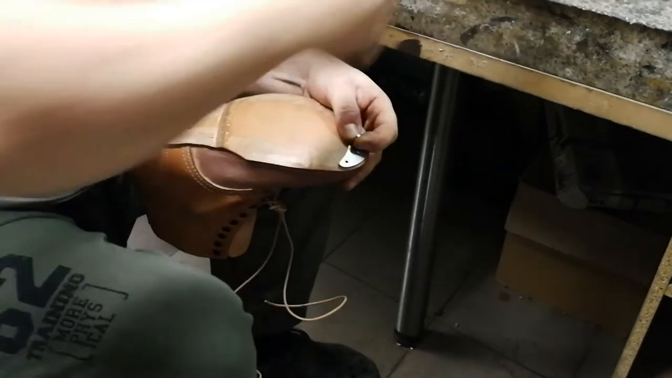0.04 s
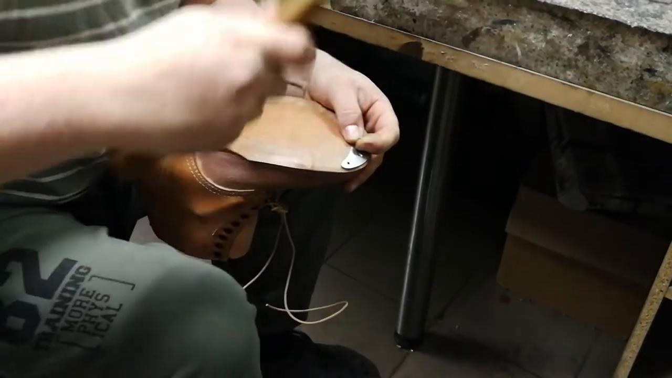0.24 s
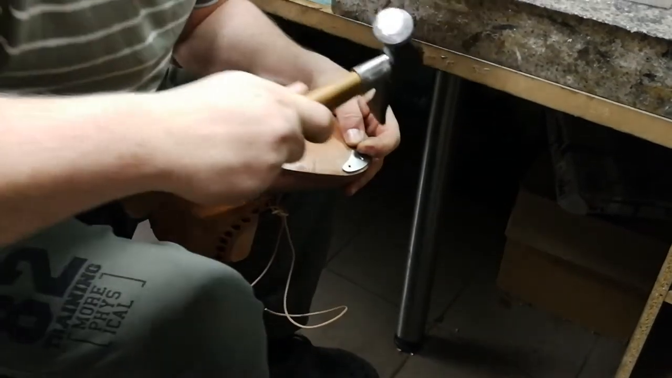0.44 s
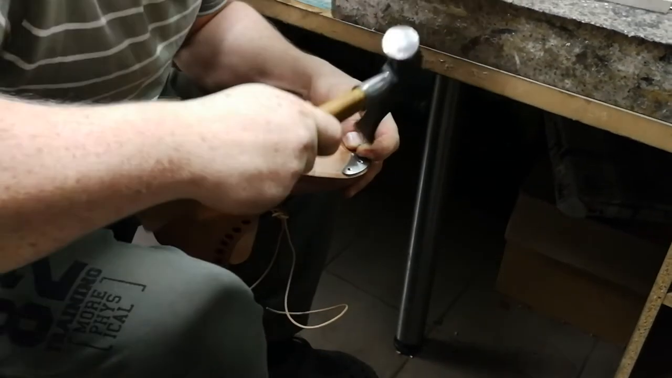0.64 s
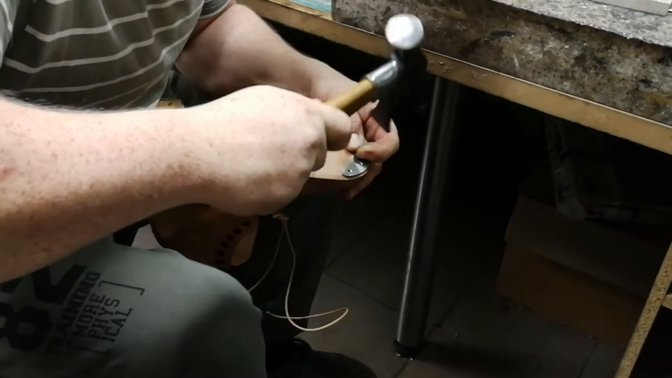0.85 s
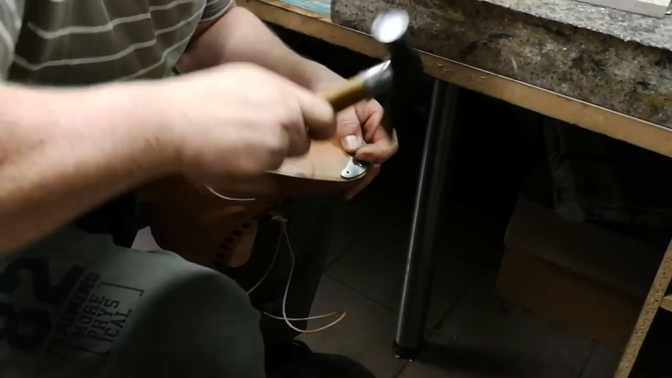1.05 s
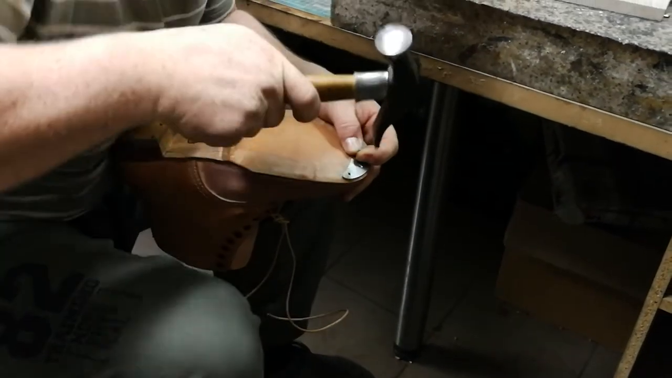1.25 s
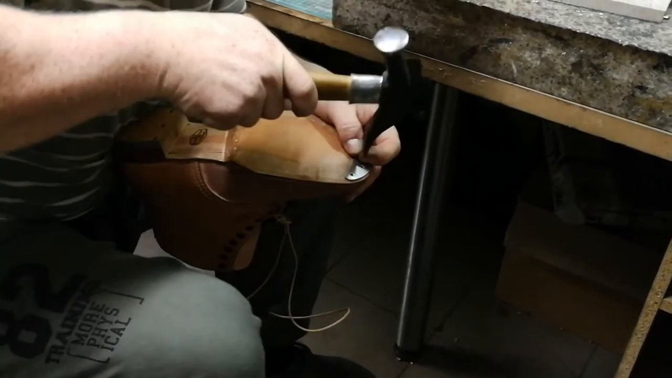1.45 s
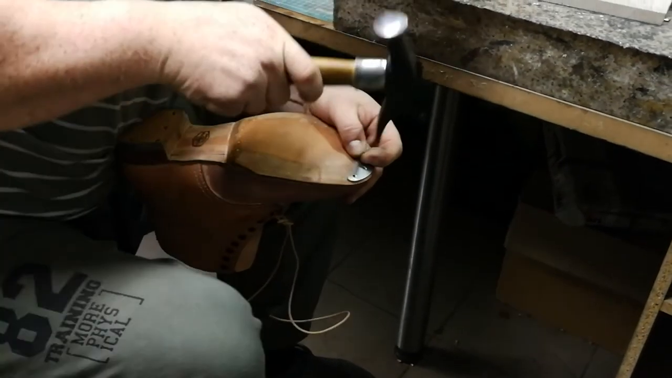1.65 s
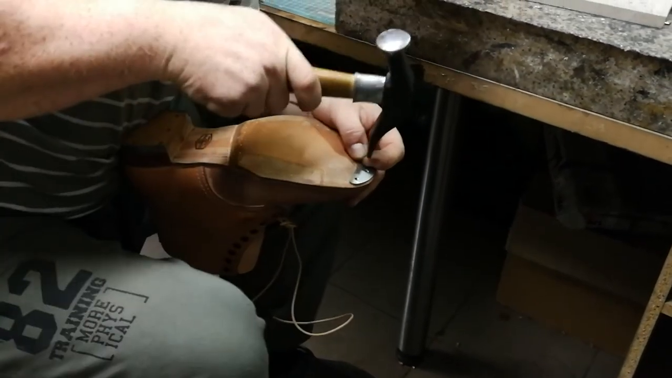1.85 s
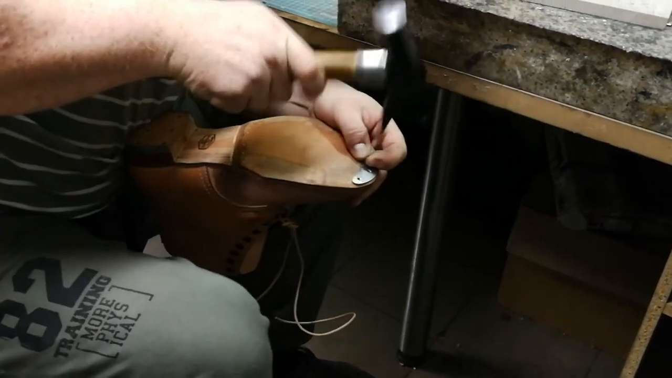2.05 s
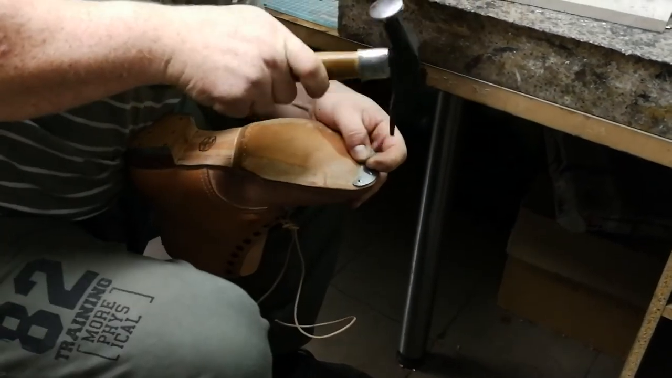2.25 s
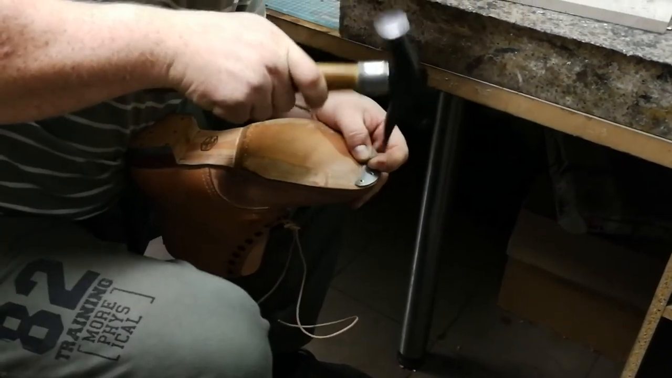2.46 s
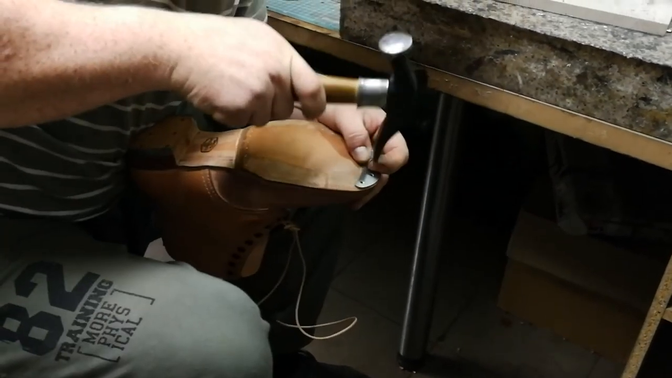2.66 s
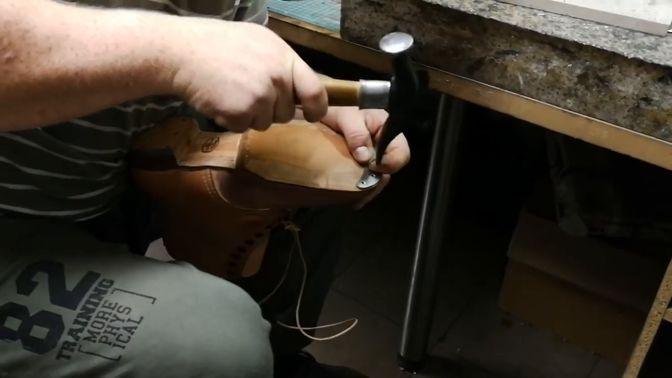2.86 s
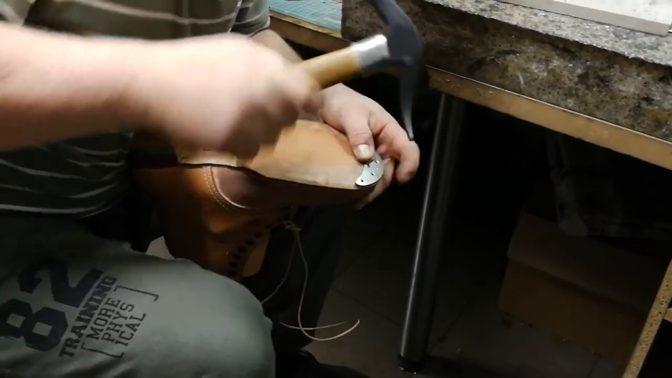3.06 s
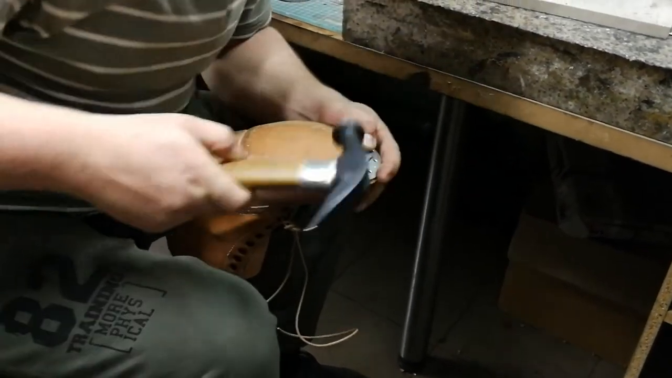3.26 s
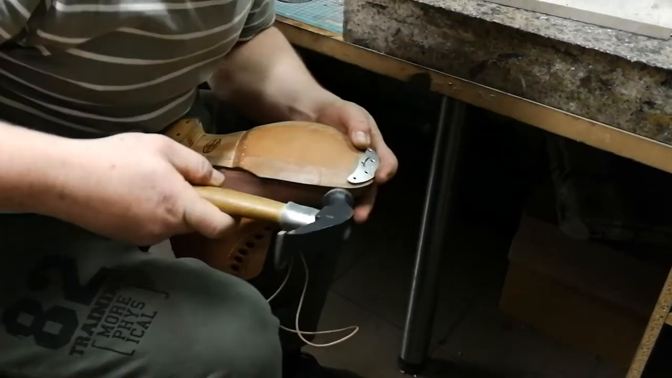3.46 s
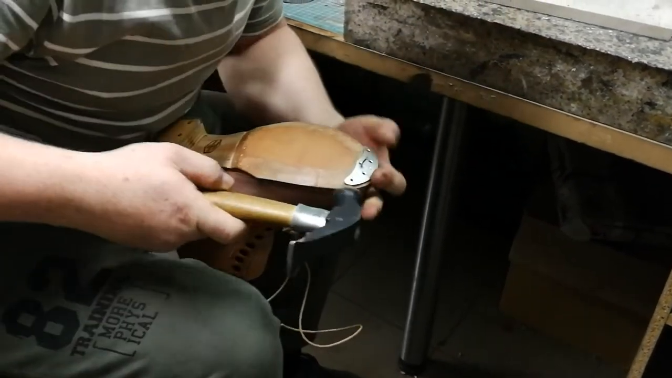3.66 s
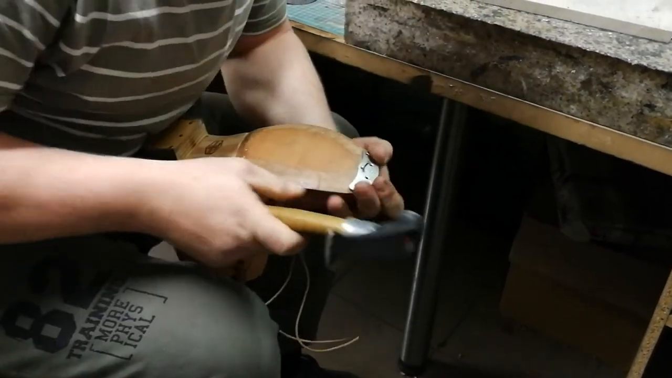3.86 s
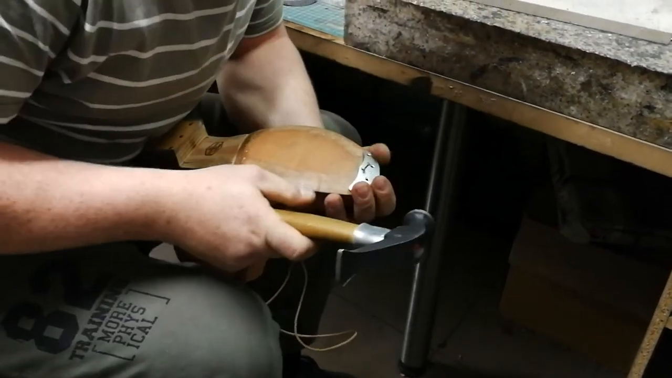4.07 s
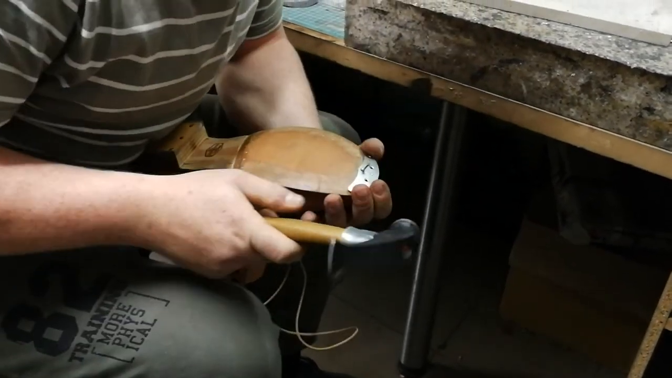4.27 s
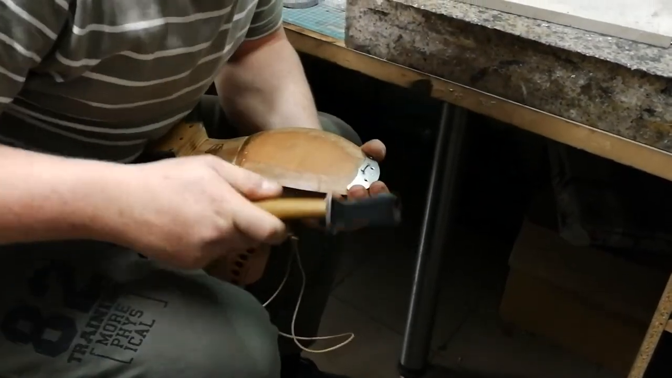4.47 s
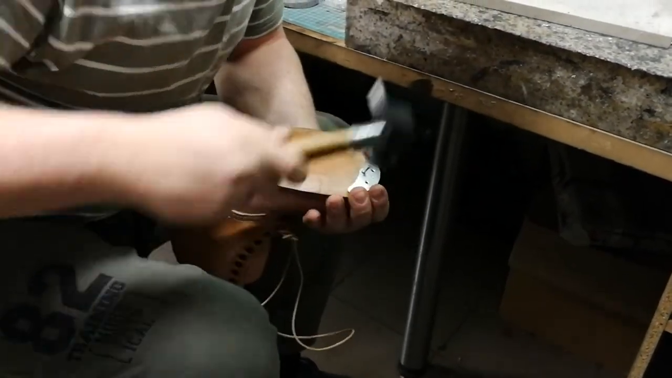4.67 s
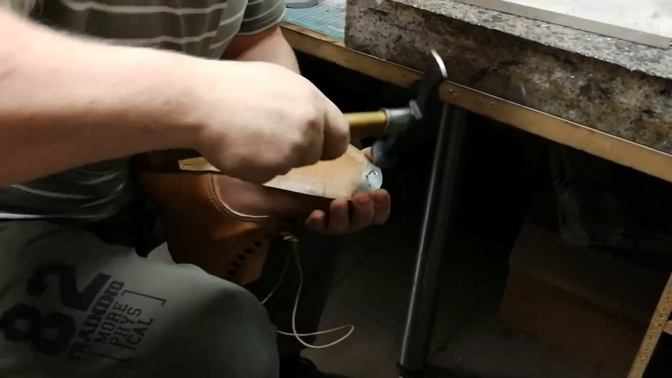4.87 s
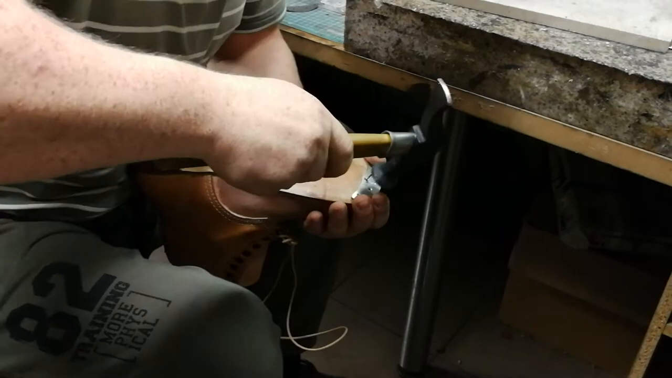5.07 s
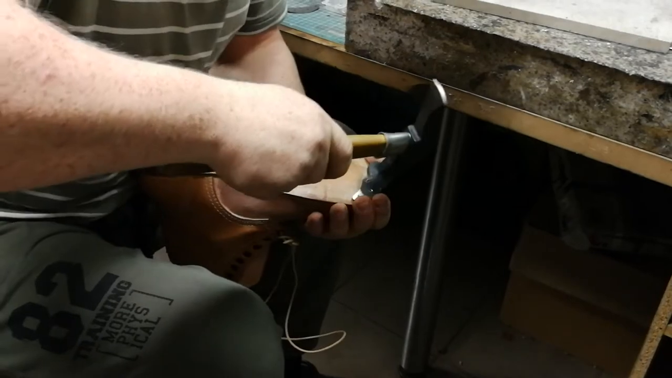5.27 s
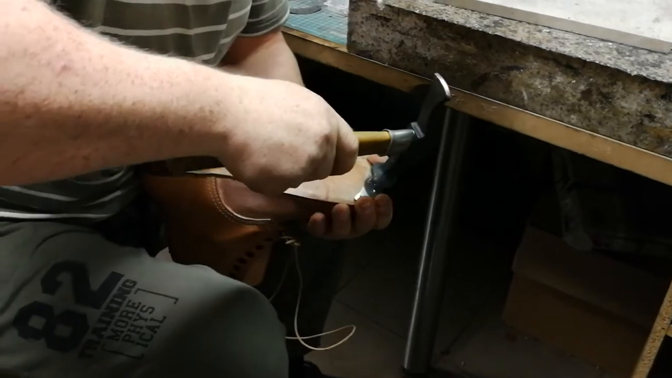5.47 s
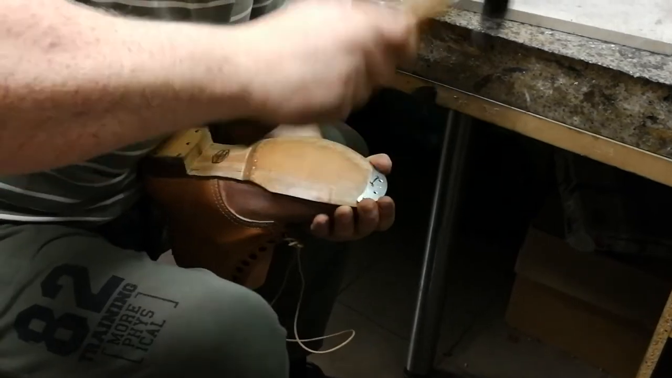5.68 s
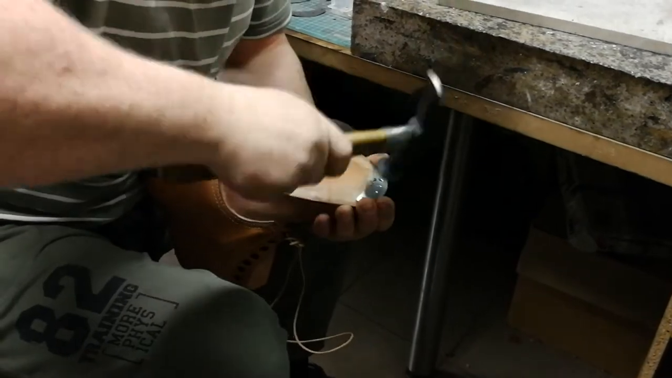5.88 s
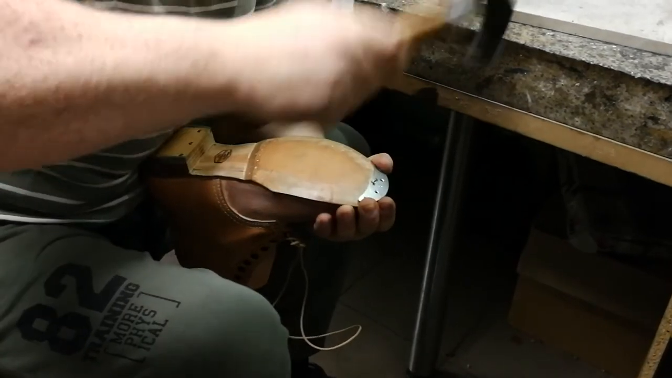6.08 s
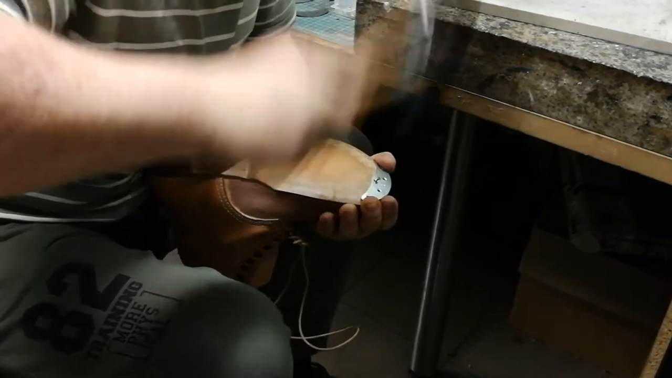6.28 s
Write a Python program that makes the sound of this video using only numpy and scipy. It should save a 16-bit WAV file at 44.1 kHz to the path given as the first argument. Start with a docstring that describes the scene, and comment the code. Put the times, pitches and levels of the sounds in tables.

```python
"""A cobbler nails a steel toe plate to a leather boot held on his knee, in a small, quiet workshop.
First, six taps of growing force set the nail; each impact cracks, excites the damped modes of the
hollow boot and reverberates in the room. In the pause that follows, the hands shift their grip, with
soft knocks and friction on the leather. Then the broad hammer face strikes three times: the first blow
glances off the plate and leaves the steel ringing, and the last two, the hardest, drive the nail home."""
import sys
import numpy as np
from scipy import signal
from scipy.fft import rfft, irfft
from scipy.io import wavfile
from scipy.ndimage import uniform_filter1d

SR = 44100
rng = np.random.default_rng(int(sys.argv[2]) if len(sys.argv) > 2 else 0)


def bounce(signal):
    """Save signal as a 16-bit WAV file at the path given by the first command-line argument."""
    frames = np.transpose(np.atleast_2d(signal))
    limited = np.clip(frames, -1, 1)
    pcm = np.round(limited * 32767).astype(np.int16)
    wavfile.write(sys.argv[1], SR, pcm)


N = 279594
AGE = np.arange(int(.7 * SR)) / SR  # time since the onset of an event [s]

# background noise of the building (frequency [Hz], spectral level [dB])
AIR_SPECTRUM = [(15, -43), (25, 0.5), (44, -2), (97, -5.5), (212, -1), (249, -10), (335, -14.5), (463, -21),
                (545, -18.5), (591, -33.5), (641, -21.5), (1520, -20.5), (6380, -26.5), (9320, -26),
                (16000, -37)]
# reverberation time of the workshop (frequency [Hz], t60 [s])
ROOM_DECAY = [(250, 0.29), (1000, 0.25), (4000, 0.28), (8000, 0.23), (10500, 0.2), (13000, 0.17)]
# first reflections from bench and floor (delay [s], level [dB], left minus right [dB])
EARLY_REFLECTIONS = [(.0053, -14.5, -0.5), (0.0119, -16, 0)]
# standing waves of the workshop (frequency [Hz], level [dB], t60 [s])
STANDING_WAVES = [(79.6, -25.5, 0.2), (96.4, -25, 0.47), (123.6, -26.5, 0.26), (178.9, -18, 0.32),
                  (221, -19.5, .25), (344.3, -28.5, 0.21), (415, -22, 0.32)]
# fingers and sleeve sliding on leather (midpoint [s], length [s], level [dB], band centre [Hz])
LEATHER_SCUFFS = [(0.104, 0.059, -67.5, 6630), (0.972, 0.15, -75.5, 5400), (2.937, 0.13, -69, 4820),
                  (3.158, 0.078, -72, 5160), (3.592, .025, -62.5, 4200), (3.73, 0.39, -78.5, 5970),
                  (4.892, .12, -76.5, 6000), (6.024, 0.024, -68.5, 4420)]
# the fading end of a steel clink at the start, then boot and handle knocks
# (time [s], level [dB], band centre [Hz], relative handle ring [dB])
SOFT_KNOCKS = [(0.001, -51.5, 2860, -41), (0.156, -62.5, 1770, -25), (0.812, -58.5, 584, -17),
               (2.876, -45, 940, -5), (2.925, -50.5, 1080, -16), (3.44, -47.5, 635, -19.5),
               (3.584, -47.5, 627, -29), (4.028, -57, 1120, -18), (4.378, -46, 6520, -22),
               (4.754, -58.5, 200, -25.5)]
# modes of the wooden handle (frequency [Hz], level [dB], t60 [s])
HANDLE_MODES = [(501, -5, .09), (974, -3, .13), (1384, 0, .11), (1938, -1, .09)]
# modes of the boot on its last (frequency [Hz], level [dB], t60 [s])
BOOT_MODES = [(243.8, -19.5, 0.053), (345.4, -0.5, 0.11), (339, -34, 0.9), (366.2, -9.5, 0.21),
              (422, -11, 0.12), (498, -10.5, 0.11), (604, -15, 0.02), (1300, -24.5, 0.06)]
# bending modes of the hard leather sole (frequency [Hz], level [dB], t60 [s])
SOLE_MODES = [(810, -14, 0.11), (1100, -23, 0.12), (1366, -12, 0.042), (1420, -19.5, 0.049),
              (1970, -19.5, .04), (2450, -17.5, 0.063)]
# modes of the toe plate (frequency [Hz], level [dB], t60 [s])
PLATE_MODES = [(6175, -23, .14), (6810, -14, .11), (6907, 0, .105), (10300, -14, .04), (10560, -16, .05)]
# modes of the hammer head (frequency [Hz], level [dB], t60 [s])
HEAD_MODES = [(2869, -22, .08), (4040, -5, .065), (7704, 0, .17), (7790, -5, .14), (9700, -10, .12),
              (13320, -7, .22), (13410, -12, .14)]
# clack of the sole (frequency [Hz], spectral level [dB])
CLACK_SPECTRUM = [(40, -27.5), (150, -26), (330, -1.5), (520, 2.5), (1100, -1.5), (1450, 2), (2300, -3),
                  (3000, -9), (5000, -22.5), (16000, -50.5)]
# crack of steel on steel (frequency [Hz], spectral level [dB])
CRACK_SPECTRUM = [(200, -32.5), (600, -17), (2000, -6.5), (3200, -8.5), (4000, -0.5), (5100, -1),
                  (6000, -4.5), (7300, 4), (9900, 4), (11300, -8), (14000, -15), (16500, -32)]
# bare steel meeting the plate (time [s], plate ring [dB], head ring [dB], head tilt [dB/octave],
# tick [dB], left minus right [dB])
PLATE_CLINKS = [(0.001, -43, -50.5, 3.5, -42, -1), (1.3116, -70, -52, -10, -43, -1),
                (5.0894, -14.5, -28, 0.5, -27.5, 1.5), (5.693, -32.5, -44.5, 13.5, -28.5, -2)]
# blows on the nail (time [s], force [dB], firmness of the last under the sole [dB], rattle [dB],
# sole note [Hz], note level [dB])
HAMMER_BLOWS = [(1.316, -28, 7.5, -14, 810, -41), (1.6464, -17, -1.5, -15.5, 725, -37.5),
                (1.9303, -8.5, 2.5, -7, 694, -40.5), (2.1841, -5.5, 0, -10.5, 510, -35),
                (2.4355, -1.5, 0, -8.5, 817, -31), (2.662, -2, 1, -9, 822, -30.5),
                (5.0834, -7.5, 0, -10.5, 350, -32.5), (5.6932, 4, 1, -17.5, 1366, -22.5),
                (6.1523, 2, -3, 5.5, 495, -17.5)]

# the parts of a blow: base level [dB], growth with force [dB/dB]
CRACK_DB, CRACK_GROWTH = -14.5, 1.08
CLACK_DB, CLACK_GROWTH = -21, 1.21
THUMP_DB, THUMP_GROWTH = -20.5, 0.9
RING_DB, RING_GROWTH = -55, .45
BOOM_DB, BOOM_GROWTH = -13.5, 0.73
# a harder blow stays longer in contact, so its crack is duller [dB/octave; the same per dB of force]
CRACK_TILT_DB, DULLING_DB = -5.5, 1
RATTLE_LOSS = 0.18  # energy spent on rattling the plate is lost to the boot's thump [dB/dB]
TURN_S = 4.5  # the hammer is turned from its narrow peen to its broad face
FACE_RING_DB, FACE_BOOM_DB, FACE_TILT_DB = 14.5, -8, 2.5  # face relative to peen; tilt per octave


def undb(db):
    """Amplitude ratio of a level in decibels."""
    return 10 ** (np.asarray(db) / 20)


def fade(t60):
    """Exponential damping: the level falls 60 dB in t60 seconds."""
    return np.exp(-np.log(1000) * AGE / np.maximum(t60, 1e-4))


def rise(build_s):
    """Onset transient: the amplitude builds smoothly from rest."""
    return 1 - np.exp(-(AGE / build_s) ** 2)


def along(points, hz):
    """Interpolation of (frequency, value) points on a logarithmic frequency axis."""
    frequency, value = np.transpose(points)
    return np.interp(np.log(hz + 1), np.log(frequency), value)


def bins(x):
    """Frequencies of a signal's Fourier spectrum."""
    return np.fft.rfftfreq(x.shape[-1], 1 / SR)


def band(hz, centre_hz, octaves):
    """Band-pass response in dB, nearly flat for the given octaves on each side of its centre."""
    return -10 * np.log10(1 + (np.log2((hz + 1) / centre_hz) / octaves) ** 6 / 2)


def colour(x, db):
    """Minimum-phase filtering: a causal response of unit power, shaped by the given dB per bin."""
    n = x.shape[-1]
    gain = undb(db) / np.sqrt(np.mean(undb(2 * db)))
    cepstrum = irfft(np.log(gain + 1e-6), n)
    cepstrum[1:n // 2] *= 2
    cepstrum[n // 2 + 1:] = 0
    return irfft(rfft(x) * np.exp(rfft(cepstrum)), n)


def low_cut(x, hz):
    """High-pass filtering: little sound remains below the given frequency."""
    return signal.sosfilt(signal.butter(2, hz, "highpass", fs=SR, output="sos"), x)


def stereo_noise(correlation):
    """Partial coherence: left and right noise share a common component."""
    mid, side = rng.standard_normal((2, len(AGE)))
    return (np.sqrt(1 + correlation) * mid + np.sqrt(1 - correlation) * np.array([side, -side])) / 2 ** .5


def whiten(x, width_hz):
    """Spectral whitening levels the chance humps of a burst; a taper closes its end."""
    spectrum = rfft(x)
    width_bins = max(int(width_hz * x.shape[-1] / SR), 1)
    power = uniform_filter1d(abs(spectrum) ** 2, width_bins, axis=-1)
    taper = np.clip(2 * (1 - AGE / AGE[-1]), 0, 1) ** 2
    return irfft(spectrum * np.sqrt(power.mean() / power), x.shape[-1]) * taper


def ring(modes, scatter_db=0, detune=0, lag_s=0):
    """Free vibration: damped modes, scattered by the contact point, reach the right side lag_s later."""
    hz, db, t60 = np.transpose(modes)[:, :, None]
    size, shift = rng.standard_normal((2, len(modes), 1))
    envelope = undb(db + scatter_db * size) * fade(t60)
    wave = np.sum(envelope * np.sin(2 * np.pi * hz * (1 + detune * shift) * AGE), axis=0)
    return np.array([wave, np.interp(AGE - lag_s, AGE, wave)])


def add(out, s, sound, pan_db=0):
    """Superposition: a stereo sound joins the mix at time s."""
    start = max(int(s * SR), 0)
    part = sound[:, :max(N - start, 0)]
    out[:, start:start + part.shape[1]] += part * undb(np.array([[pan_db], [-pan_db]]) / 2)


def air(level_db=-69):
    """Ambient noise: a faint building rumble, nearly coherent on both sides, under a diffuse hiss."""
    mid, side = rng.standard_normal((2, N))
    hz = bins(mid)
    gain = undb(along(AIR_SPECTRUM, hz))
    width = undb(along([(60, -16.0), (200, -14.0), (500, 2.5), (4000, -0.5)], hz))
    mid = irfft(rfft(mid) * gain, N)
    side = irfft(rfft(side) * gain * width, N)
    return undb(level_db) * (mid + np.array([side, -side])) / mid.std()


def reverberation(x, wet_db, correlation, build_s):
    """Repeated reflection from bench, floor and walls builds a dense tail that loses its treble first."""
    noise = stereo_noise(correlation)
    spectrum, hz = rfft(noise), bins(noise)
    centres, decays = np.transpose(ROOM_DECAY)
    tail = 0
    for share, t60 in zip(np.eye(len(centres)), decays):
        band_gain = along(np.c_[centres, share], hz)
        tail = tail + irfft(spectrum * band_gain, len(AGE)) * fade(t60)
    tail = whiten(tail * rise(build_s), width_hz=50) * rise(build_s)
    tail *= undb(wet_db) / np.sqrt(np.sum(tail ** 2) / 2)
    return signal.fftconvolve(x, tail, axes=1)[:, :N]


def slide(out, middle_s, length_s, db, hz, octaves):
    """Sliding friction: grainy noise swells and fades with the contact pressure."""
    grains = stereo_noise(correlation=0.21) * undb(4.3 * rng.standard_normal(len(AGE)))
    scuff = colour(grains, band(bins(grains), hz, octaves))
    start = max(middle_s - 1.5 * length_s, 0)
    pressure = np.exp(-2 * ((start + AGE - middle_s) / length_s) ** 2)
    add(out, start, undb(db) * pressure * scuff / scuff.std())


def knock(hz, handle_db, reference_hz=806):
    """Damped impact: a lower knock starts more softly, lasts longer and shakes the boot more."""
    octave = np.log2(hz / reference_hz)
    stretch = 2 ** (-0.21 * octave)
    burst = stereo_noise(correlation=0.2) * fade(0.069 * stretch)
    burst = whiten(burst, width_hz=200 / stretch)
    burst = colour(burst, band(bins(burst), hz, octaves=0.61))
    boot_db = -7.5 - 6 * octave
    modes = [(f, db + boot_db, t60) for f, db, t60 in BOOT_MODES]
    modes += [(f, db + handle_db, t60) for f, db, t60 in HANDLE_MODES]
    bodies = ring(modes, scatter_db=1, detune=.006, lag_s=.0001)
    return (burst + bodies) * rise(build_s=0.0023 * stretch ** 2)


def handling():
    """Light impact and friction: knocks, finger taps, and skin and cloth scuffing the leather."""
    out = np.zeros((2, N))
    for s, db, hz, handle_db in SOFT_KNOCKS:
        add(out, s, undb(db) * knock(hz, handle_db))
    # faint finger taps while the grip on the boot changes
    from_s, to_s, tap_db, tap_hz = 3.78, 4.15, -63, 555
    taps = rng.random(size=(3, 2))
    for k, (when, pitch) in enumerate(taps):
        tap = knock(tap_hz * 2 ** (pitch - .5), handle_db=-19.5)
        add(out, from_s + (to_s - from_s) * (k + when) / len(taps), undb(tap_db) * tap)
    for scuff in LEATHER_SCUFFS:
        slide(out, *scuff, octaves=0.811)
    # a thin scrape as the fingers let go of the nail
    slide(out, middle_s=2.955, length_s=.045, db=-69.5, hz=4820, octaves=.025)
    return out


def contact(spectrum, t60, rattle_db, rattle_t60, correlation, tilt_db=0):
    """Broadband excitation: a brief hard contact, then nail and plate chatter against the sole."""
    envelope = np.hypot(fade(t60), undb(rattle_db) * fade(rattle_t60))
    burst = whiten(stereo_noise(correlation) * envelope, width_hz=890)
    hz = bins(burst)
    return colour(burst, along(spectrum, hz) + tilt_db * np.log2(1 + hz / 1000))


def steel_crack(rattle_db, tilt_db):
    """Impulsive excitation: steel meeting steel radiates a bare pulse and a burst of contact noise."""
    burst = contact(CRACK_SPECTRUM, t60=0.017, rattle_db=rattle_db - 5.5, rattle_t60=0.083,
                    correlation=0.27, tilt_db=tilt_db)
    impulse = np.tile(1. * (AGE == 0), (2, 1))
    return burst + undb(-8) * colour(impulse, along(CRACK_SPECTRUM, bins(impulse)))


def sole_clack(rattle_db):
    """Bending vibration of the sole: leather yields, so its clack swells just behind the crack."""
    burst = contact(CLACK_SPECTRUM, t60=0.043, rattle_db=rattle_db, rattle_t60=0.15, correlation=.7)
    bending = ring(SOLE_MODES, scatter_db=2, detune=.02, lag_s=.00003)
    return (burst + bending) * rise(build_s=0.0018)


def boot_thump(body_db, note_hz, note_db):
    """Resonance of the hollow boot, with a short sole note that depends on nail depth and grip."""
    note = undb(note_db) * ring([(note_hz, 0, .055)], lag_s=.0001)
    body = undb(body_db) * ring(BOOT_MODES, scatter_db=1, detune=.012, lag_s=.0003)
    return (note + body) * rise(build_s=0.0016)


def plate_clink(plate_db, head_db, tilt_db):
    """Free vibration of plate and hammer head; tilt_db sets how brightly the head rings."""
    modes = [(hz, db + head_db + tilt_db * np.log2(hz / 7000), t60) for hz, db, t60 in HEAD_MODES]
    modes += [(hz, db + plate_db, t60) for hz, db, t60 in PLATE_MODES]
    return ring(modes, lag_s=.00002)


def hammering():
    """Impact excitation: crack, clack, ring, thump and room boom each grow as a power of the force."""
    impacts, steel, thump, boom = np.zeros((4, 2, N))
    for s, force_db, firm_db, rattle_db, note_hz, note_db in HAMMER_BLOWS:
        face = s > TURN_S
        tilt_db = CRACK_TILT_DB - DULLING_DB * force_db + face * FACE_TILT_DB
        crack_db = CRACK_DB + CRACK_GROWTH * force_db
        ring_db = RING_DB + RING_GROWTH * force_db + face * FACE_RING_DB
        thump_db = THUMP_DB + THUMP_GROWTH * force_db - RATTLE_LOSS * rattle_db
        # a firmly backed sole clacks; a loosely backed one gives way and booms
        clack_db = CLACK_DB + CLACK_GROWTH * force_db + firm_db
        boom_db = BOOM_DB + BOOM_GROWTH * force_db - firm_db + face * FACE_BOOM_DB
        add(impacts, s, undb(crack_db) * steel_crack(rattle_db, tilt_db))
        add(impacts, s, undb(clack_db) * sole_clack(rattle_db))
        add(steel, s, undb(ring_db) * ring(HEAD_MODES, scatter_db=1, detune=.0005, lag_s=.00003))
        add(thump, s, boot_thump(thump_db, note_hz, note_db))
        standing = ring(STANDING_WAVES, scatter_db=1, detune=.006)
        add(boom, s, undb(boom_db) * rise(build_s=0.0093) * standing)
    for s, plate_db, head_db, tilt_db, tick_db, pan_db in PLATE_CLINKS:
        tick = contact(CRACK_SPECTRUM, t60=.006, rattle_db=-12.5, rattle_t60=0.041, correlation=.3)
        add(impacts, s, undb(tick_db) * tick, pan_db)
        add(steel, s, plate_clink(plate_db, head_db, tilt_db), pan_db)
    return impacts, steel, low_cut(thump, hz=200), low_cut(boom, hz=55)


def scene():
    """Superposition of direct sound, early reflections, reverberation and ambient noise."""
    impacts, steel, thump, boom = hammering()
    bright = impacts + handling()
    echoes = reverberation(bright, wet_db=-6.5, correlation=.45, build_s=0.0035)
    echoes += reverberation(thump, wet_db=-9.0, correlation=.8, build_s=0.0064)
    echoes += reverberation(steel, wet_db=-11.0, correlation=.1, build_s=0.01)
    for delay, db, pan_db in EARLY_REFLECTIONS:
        add(echoes, delay, undb(db) * bright, pan_db)
    return bright + steel + thump + boom + echoes + air()


def record(dry):
    """Clipping at full scale, then band limiting by a steep low-pass filter."""
    top_hz = 16400
    return signal.sosfilt(signal.ellip(8, .2, 70, top_hz, fs=SR, output="sos"), np.clip(dry, -1, 1))


dry = scene()
out = record(dry)
bounce(out)
```